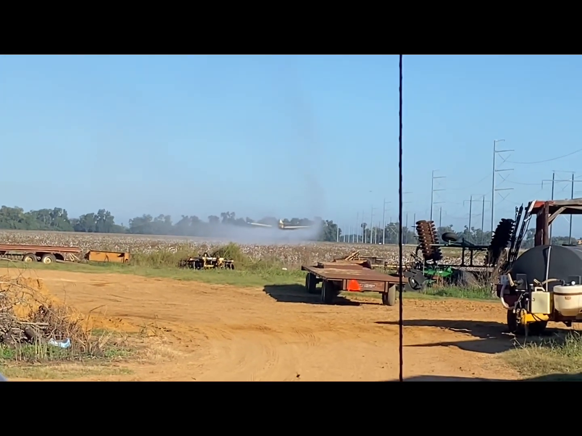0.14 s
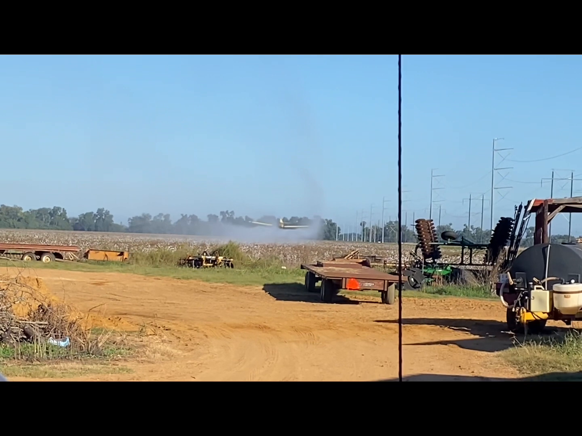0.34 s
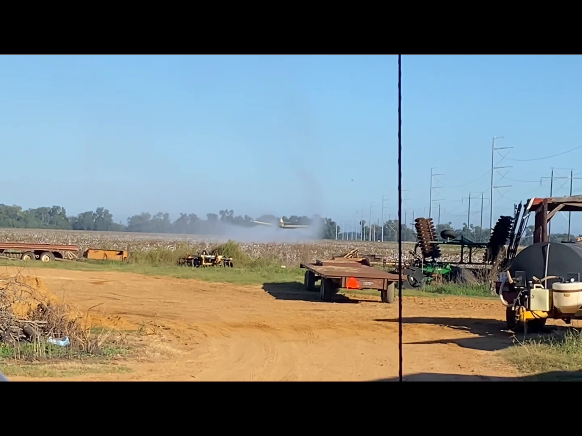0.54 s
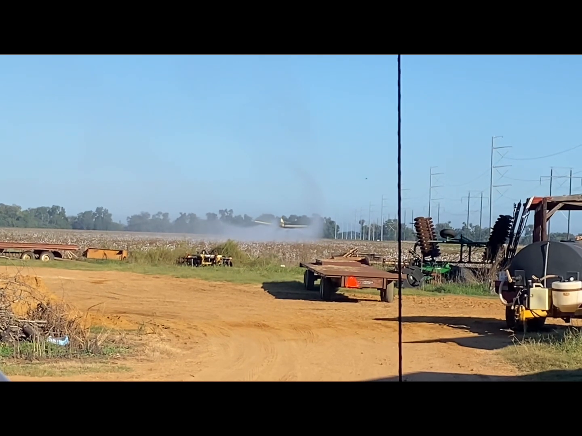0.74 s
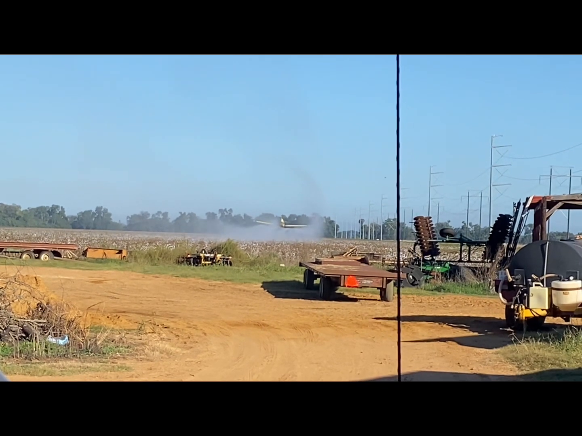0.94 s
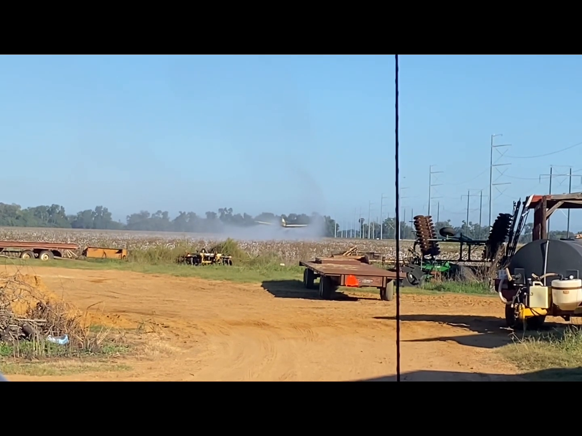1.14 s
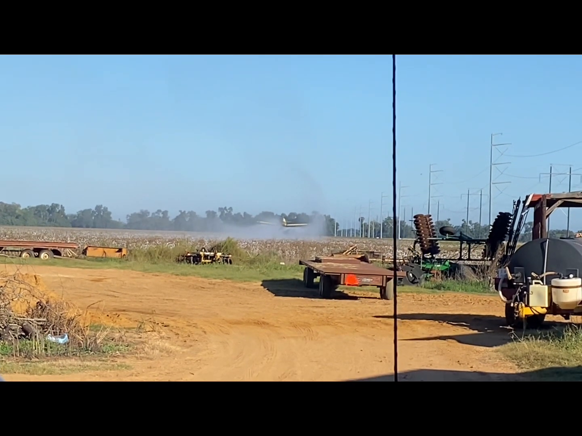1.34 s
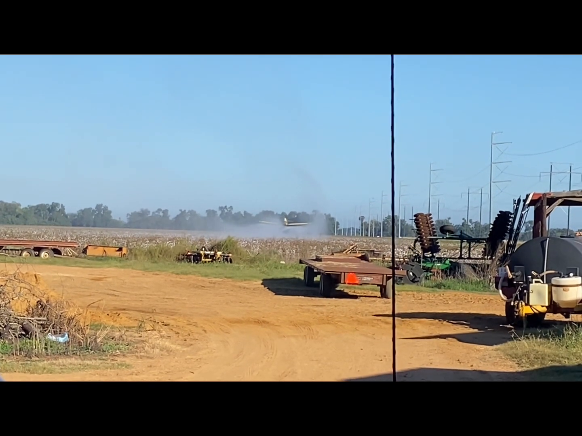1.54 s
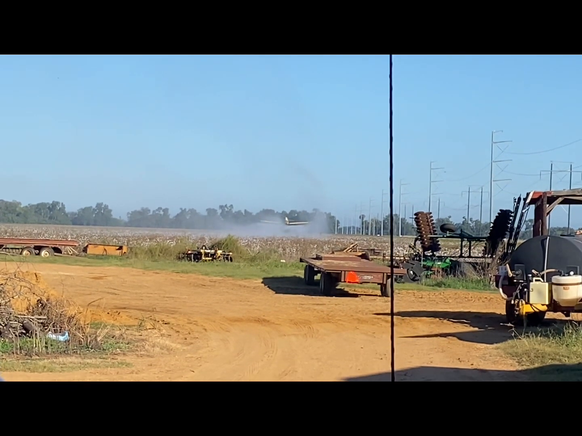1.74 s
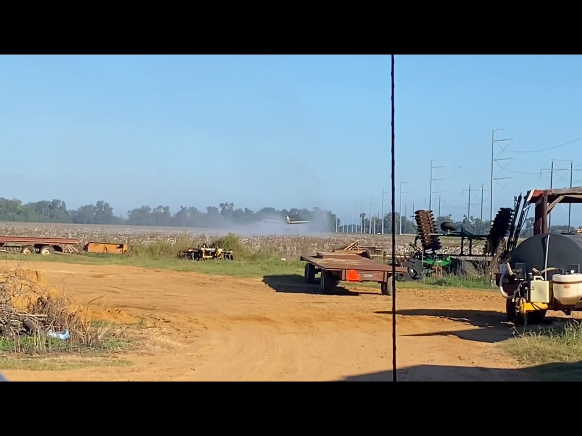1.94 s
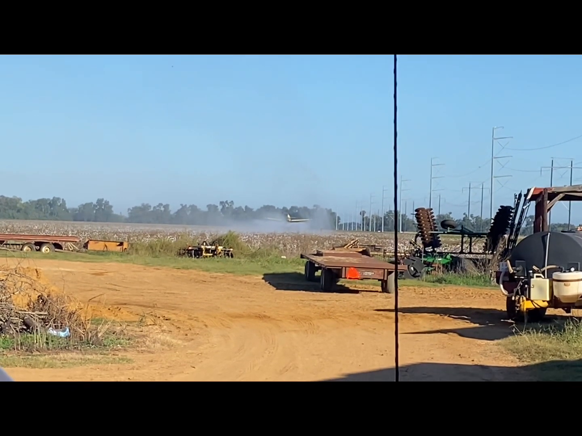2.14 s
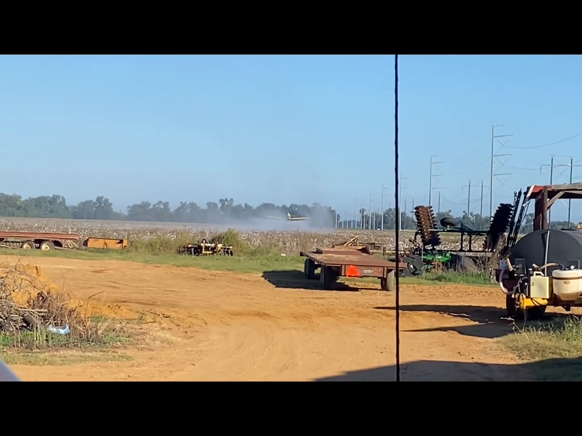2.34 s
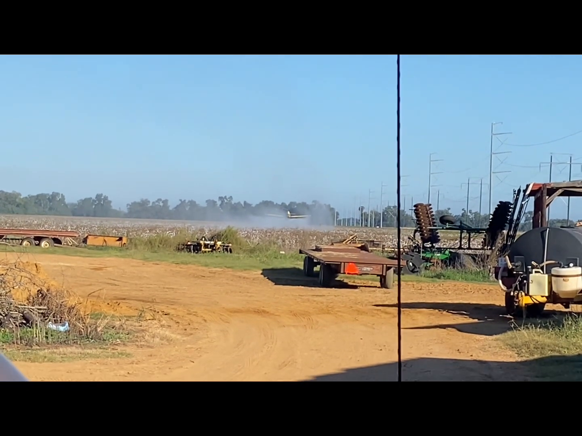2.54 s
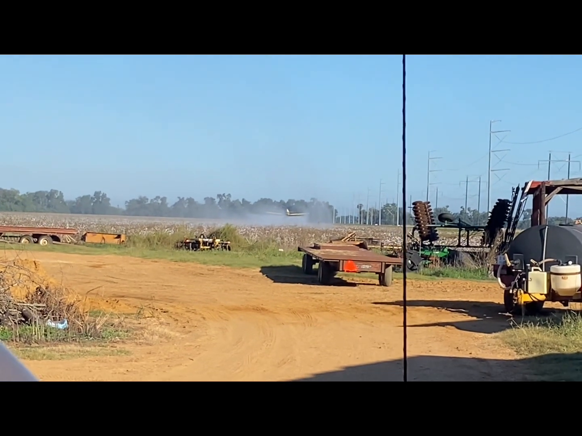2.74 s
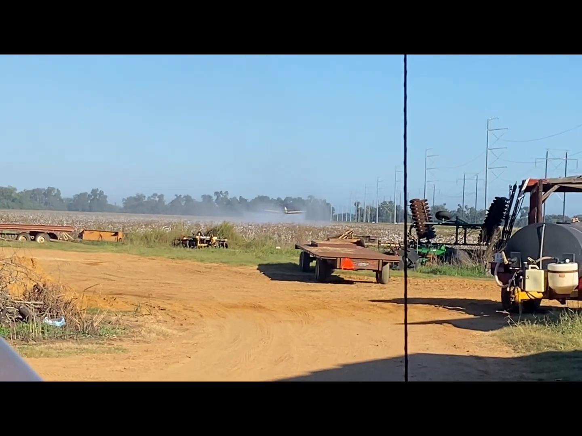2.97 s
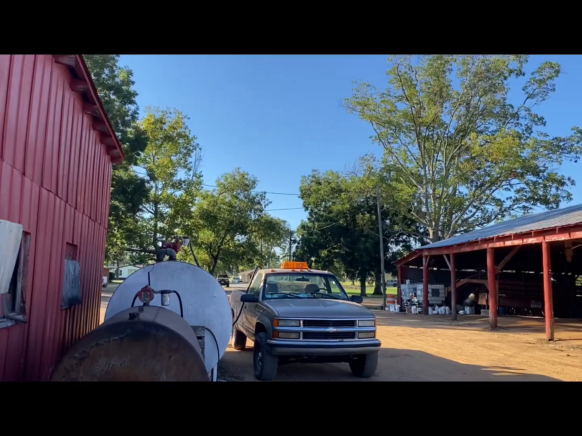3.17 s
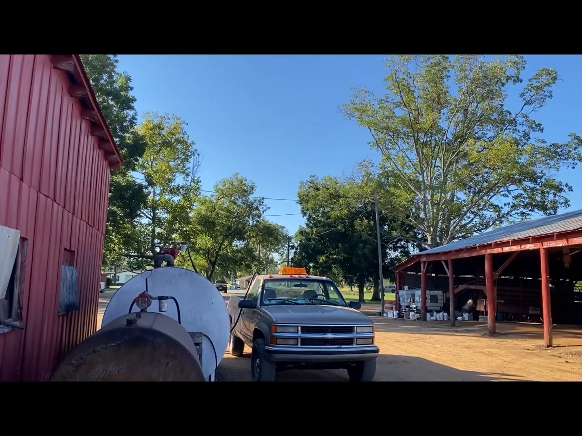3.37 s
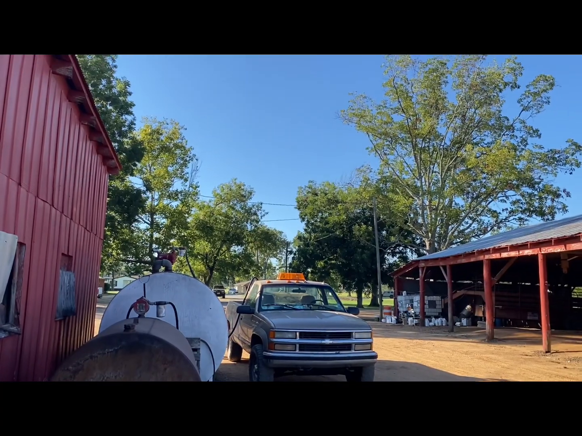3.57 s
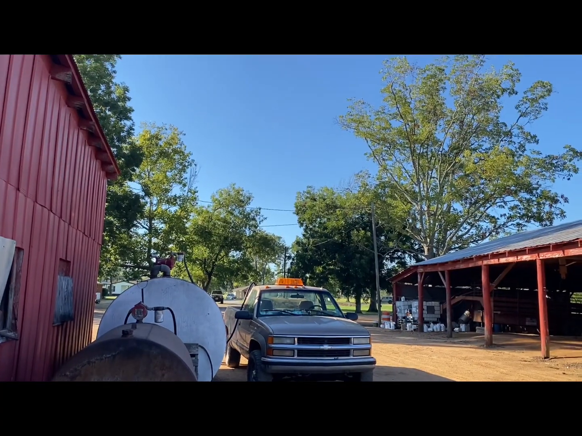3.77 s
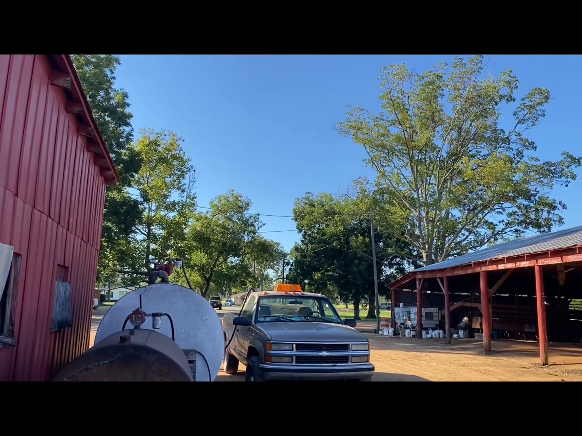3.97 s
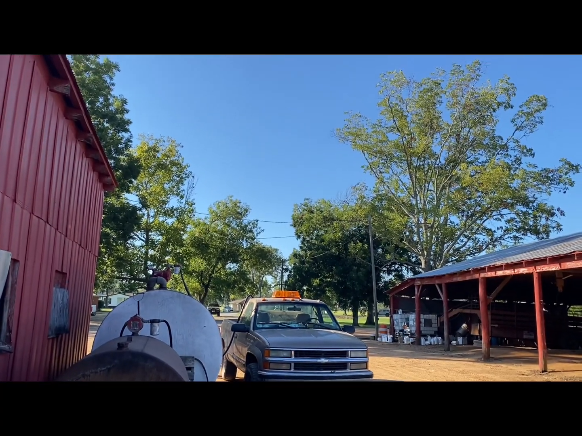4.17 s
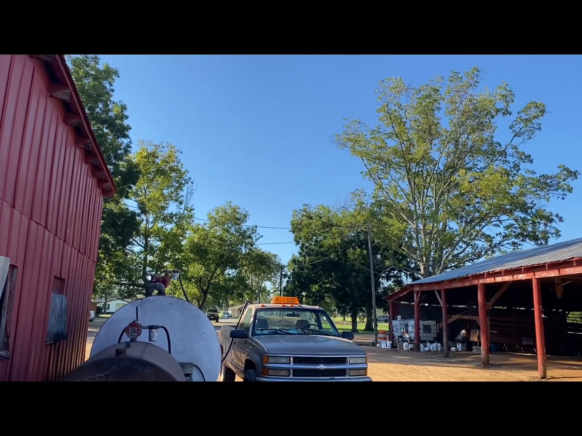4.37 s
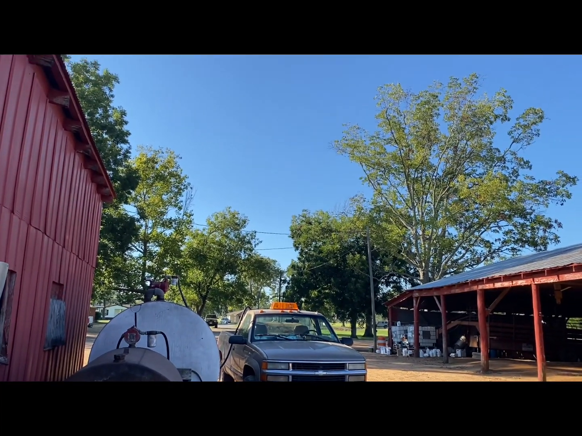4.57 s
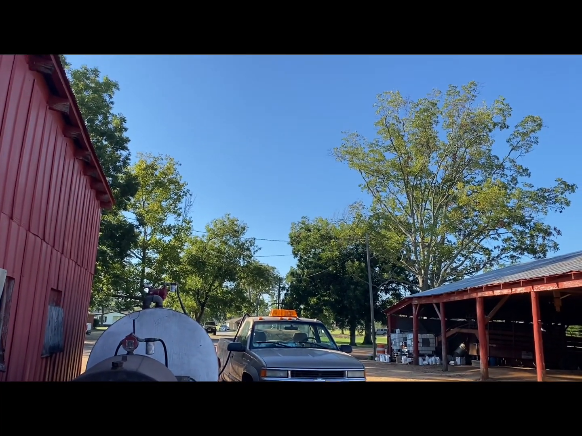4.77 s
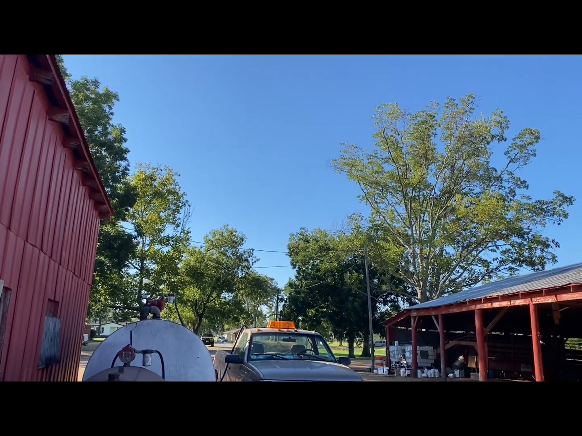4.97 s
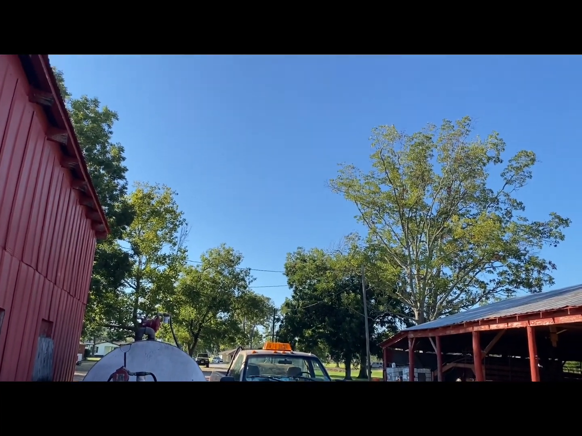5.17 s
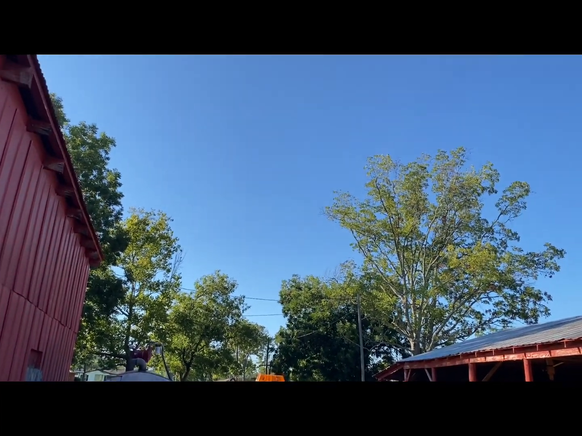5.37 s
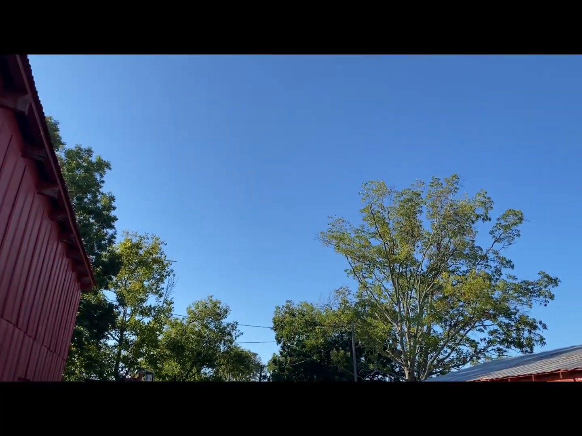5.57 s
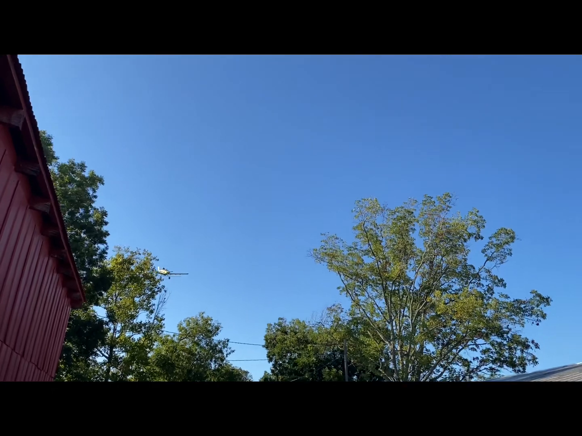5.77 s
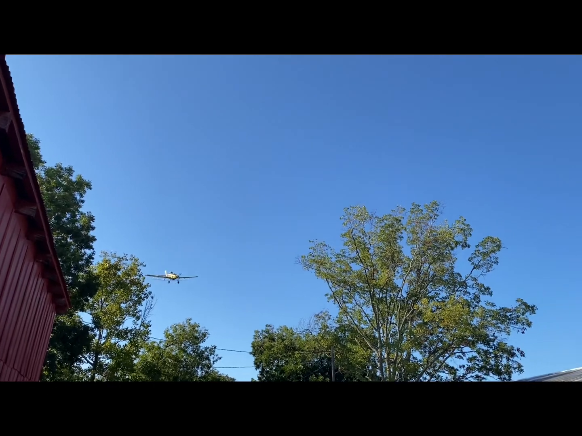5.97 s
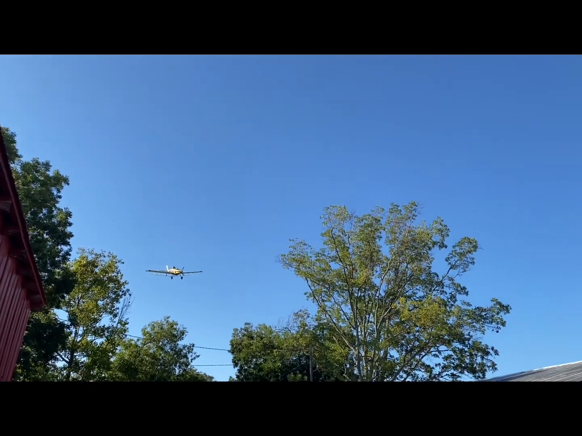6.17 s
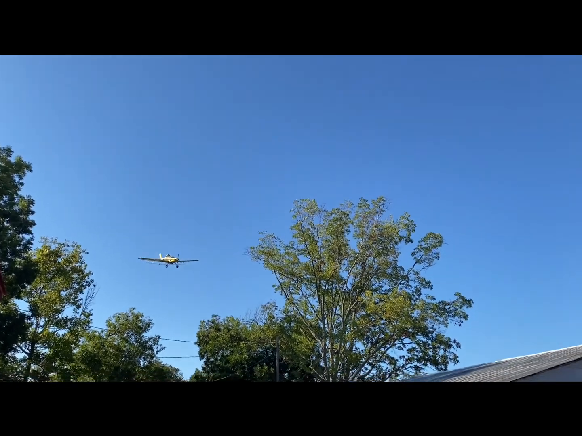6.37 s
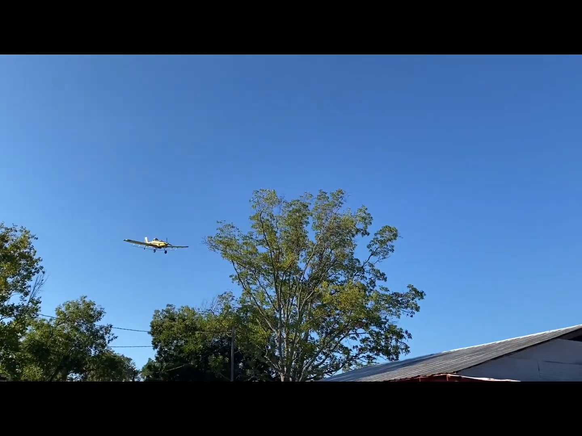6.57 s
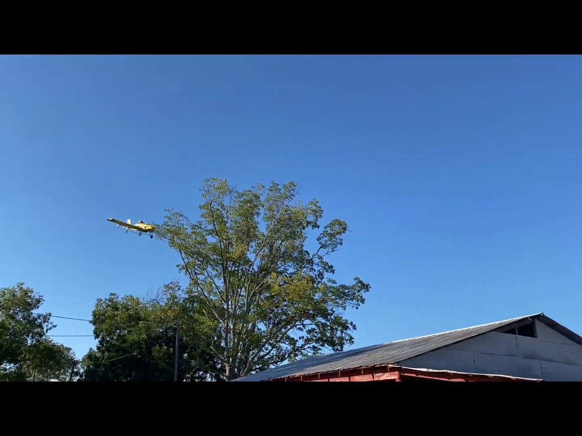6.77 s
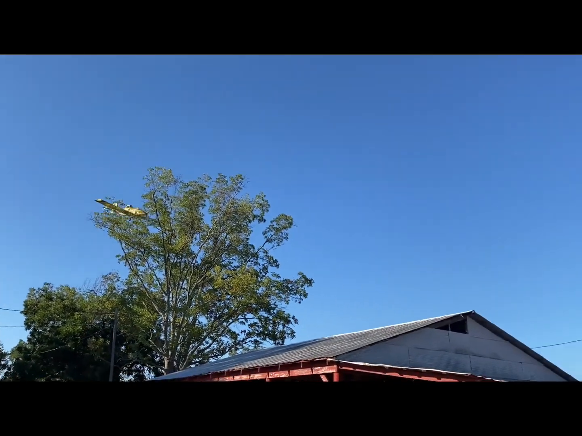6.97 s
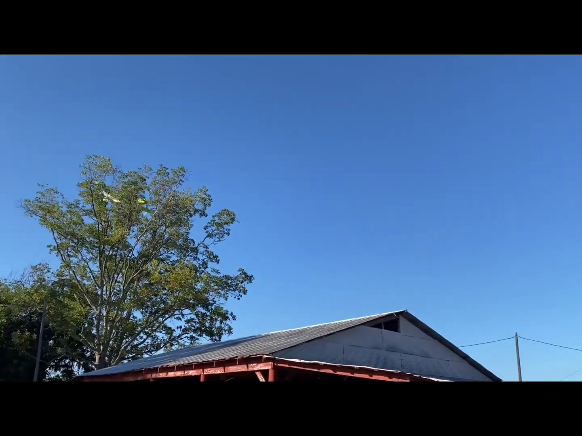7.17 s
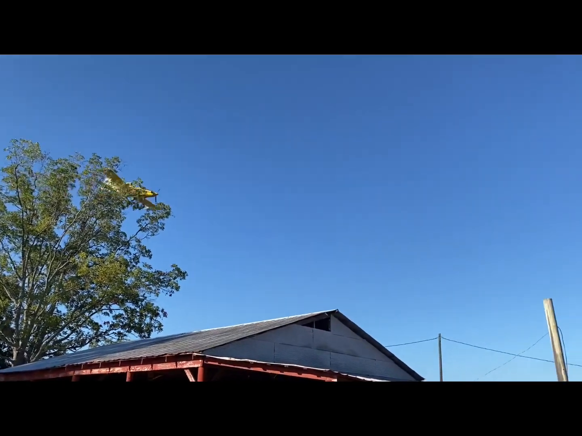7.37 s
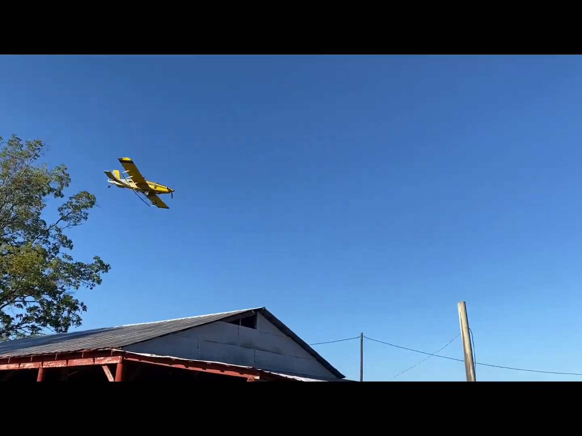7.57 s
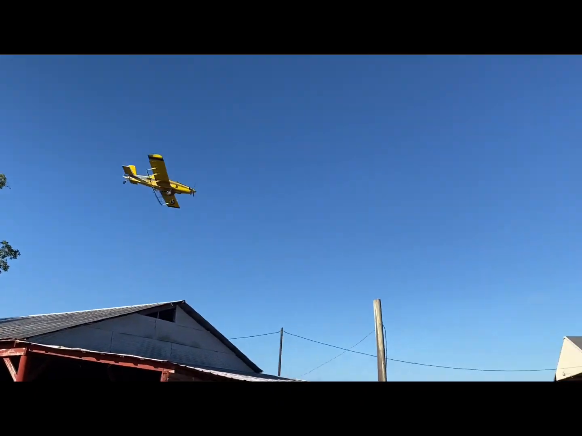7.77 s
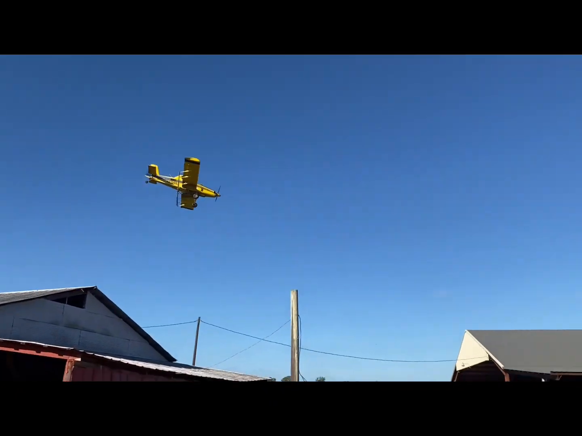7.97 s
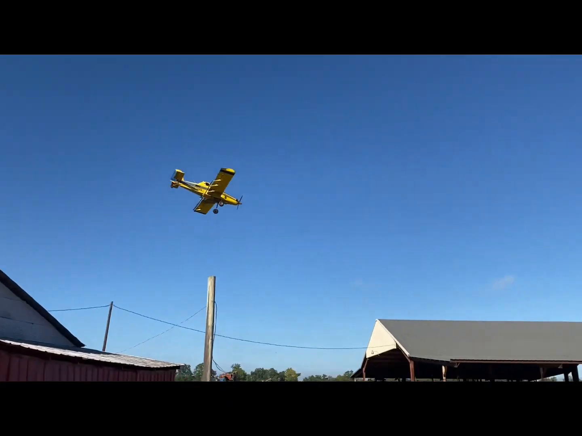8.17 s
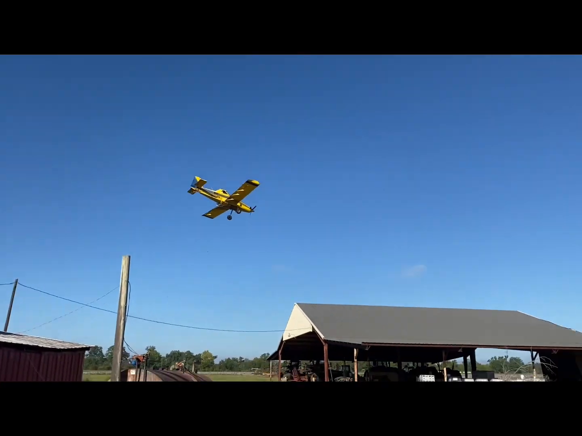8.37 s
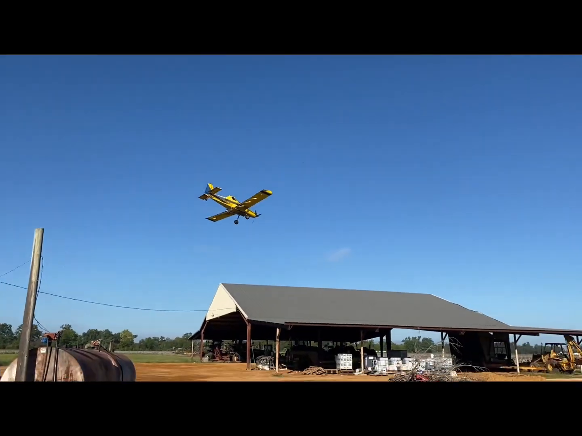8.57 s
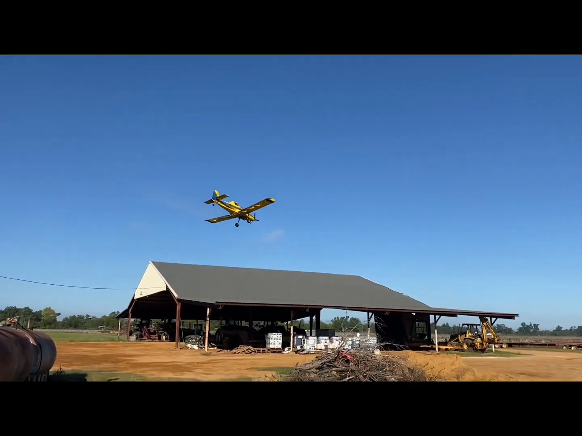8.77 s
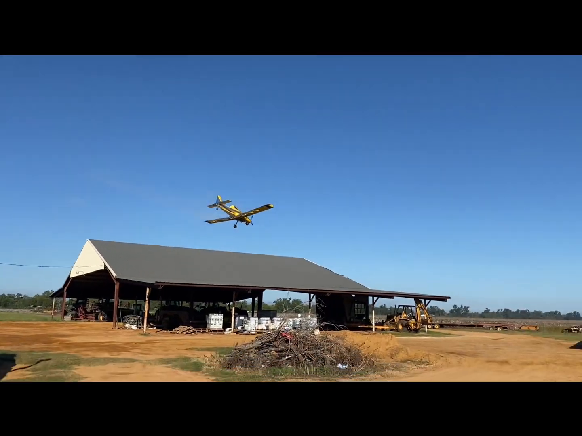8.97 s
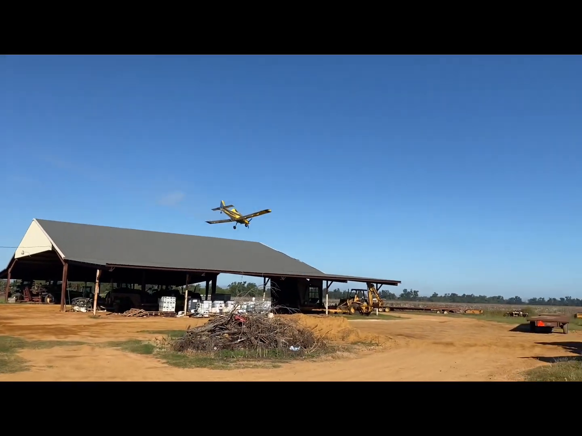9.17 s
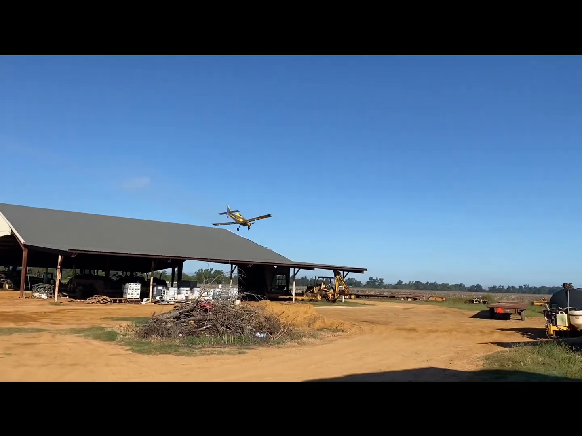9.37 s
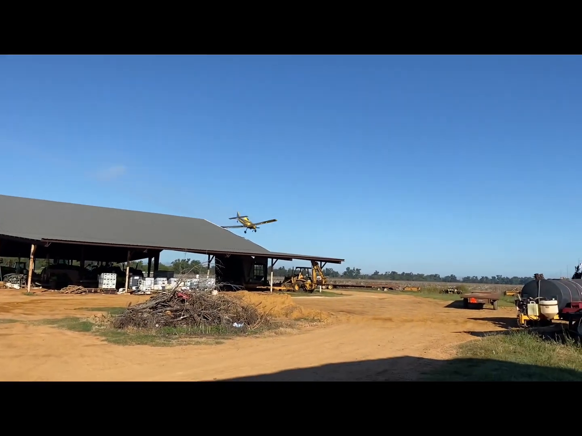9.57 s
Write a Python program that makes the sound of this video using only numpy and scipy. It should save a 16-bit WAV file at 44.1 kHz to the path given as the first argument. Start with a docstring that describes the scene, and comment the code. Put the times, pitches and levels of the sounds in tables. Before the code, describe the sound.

Outdoors on a farm, a nearby compressor and fan give a steady hum and airy hiss. The sound suddenly shifts across the yard, leaving the machine faint, and a single propeller plane builds from afar. Its rushing air, turbine whine and blade buzz become much louder than the machine, gliding down in pitch as it flies low over the microphone and leaves with a deep drone.

```python
"""A farmyard, heard from two spots. Close to a cooling unit, its compressor and fan hum and air hisses
through the cabinet; after a cut the microphone is across the yard and the unit is faint and far.
A turboprop crop duster comes in low from behind trees and a barn, banks overhead and leaves. Its blade
tone glides down (Doppler) over the rush of the propeller wash and a thin turbine whine, and the echo
off the ground combs the wash and the buzz of the blades."""
import sys
import numpy as np
from scipy.fft import rfft, irfft, next_fast_len
from scipy.io import wavfile
from scipy.ndimage import uniform_filter1d, minimum_filter1d, map_coordinates

SR = 44100
rng = np.random.default_rng(int(sys.argv[2]) if len(sys.argv) > 2 else 0)


def unload_wav(signal):
    """Save mono or channel-first audio to the path in sys.argv[1] as 16-bit WAV at rate SR, clipped to [-1, 1]."""
    wavfile.write(
        sys.argv[1],
        SR,
        np.round(np.clip(np.atleast_2d(signal).T, -1, 1) * 32767).astype(np.int16),
    )


N = 423801
CUT_S = 3.095  # from beside the unit to across the yard
NEAREST_S, PASSING_S = 7.993, 1.033  # when the plane is nearest; time it takes to fly that distance

# the plane's stereo image: freq_hz, left_right_db, side_mid_db, left_lead (-1 to 1)
PLANE_IMAGE = [(60, 2, -43, .5), (128, 0.7, -9, 0.77), (251, 2, -14.5, 0.28), (515, 2, -5.5, 0.94),
               (1080, 7.5, -3, 0.95), (1590, -4, 2.5, 0.3), (1980, -0.5, -1.5, 0.39), (2700, 5, 1, 0.53),
               (3100, 7, 0, -0.54), (4260, 1, -4.5, -0.38), (6800, -1, -7.5, .8), (8900, 1, 10, -.7),
               (10900, 0, -2.5, 0)]


def amp(db):
    """Decibels to gain."""
    return 10 ** (np.asarray(db) / 20)


def unit_rms(x):
    """Scale to rms 1."""
    return x / np.sqrt(np.mean(x ** 2) + 1e-20)


def clock():
    """The time of every sample, in seconds."""
    return np.arange(N) / SR


def along(rows, hz, column=1):
    """One column of a frequency table, read on a log axis."""
    table = np.transpose(rows)
    return np.interp(np.log(hz + 1), np.log(table[0] + 1), table[column])


def curves(rows):
    """One value per sample for each column after the time."""
    times, *columns = np.transpose(rows)
    return [np.interp(clock(), times, column) for column in columns]


def wobble(rate_hz):
    """A smooth random curve with rate_hz knots a second."""
    knots = rng.standard_normal(int(N * rate_hz / SR) + 4)
    coarse = np.arange(0, N, 32)
    return np.interp(np.arange(N), coarse, map_coordinates(knots, [coarse * rate_hz / SR]))


def swell(peak_s, length_s):
    """A smooth bump of height 1."""
    return np.exp(-(2 * (clock() - peak_s) / length_s) ** 2)


def filtered(x, response):
    """x through a complex frequency response."""
    size = next_fast_len(N + 8192, real=True)
    return irfft(rfft(x, size) * response(np.fft.rfftfreq(size, 1 / SR)), size)[..., :N]


def noise(response):
    """Two unrelated noises of rms 1 with one colour."""
    return unit_rms(filtered(rng.standard_normal((2, N)), response))


def noise_peak(centre_hz, half_width_hz):
    """Two noises gathered around one frequency."""
    return noise(lambda hz: 1 / (1 + ((hz - centre_hz) / half_width_hz) ** 2))


def swoosh(rows, width_hz):
    """A flat-topped band of noise whose centre and level follow a curve."""
    centre_hz, db = curves(rows)
    band = noise(lambda hz: 1 / (1 + (2 * hz / width_hz) ** 4))
    return amp(db) * band * np.sqrt(2) * np.sin(2 * np.pi * np.cumsum(centre_hz) / SR)


def panning(image, hz):
    """Side-to-mid gain that gives an image's left-right level difference."""
    return np.tanh(np.log(amp(along(image, hz))) / 2)


def spread(pair, image):
    """Left and right from two noises: part level difference, part phase lead, part diffuse."""
    def side_gains(hz):
        pan = panning(image, hz)
        width = np.sqrt(np.maximum(amp(along(image, hz, column=2)) ** 2 - pan ** 2, 0))
        lead = np.clip(along(image, hz, column=3), -1, 1)
        return np.array([pan + 1j * lead * width, np.sqrt(1 - lead ** 2) * width])
    side = filtered(pair, side_gains).sum(axis=0)
    return np.array([pair[0] + side, pair[0] - side])


def cooling_unit(shaft_hz=58.21, air_db=-30.5, rattle_db=0.5, rise_db=2.0):
    """Close up: compressor and fan tones beat over air hissing through ringing sheet metal."""
    # compressor hum: shaft_multiple, level_db
    compressor = [(1, -44), (2, -54), (3, -34), (4, -33), (5, -47), (6, -46), (7, -50), (8, -43), (9, -47),
                  (10, -46), (12, -43), (13, -49), (16, -53), (17, -51), (18, -48.5), (21, -59), (37, -60),
                  (39, -60), (40, -54), (44, -56), (46, -51.5), (48, -52.5), (52, -55), (53, -57),
                  (54, -58), (57, -58), (60, -59)]
    # fan and mains tones: pitch_hz, level_db
    fan = [(84, -45.5), (119.9, -46), (178.2, -37), (235.3, -48), (267, -56), (356.4, -66), (557, -50),
           (570.7, -46), (903.5, -48)]
    # air rushing through the cabinet: freq_hz, level_db
    cabinet = [(25, -23), (55, 4), (170, -0.5), (260, -2.5), (400, -5.5), (620, -1.5), (830, -7.5),
               (1080, -6), (1400, -17), (2050, -15), (2500, -11), (2800, -7.2), (3400, -10.5),
               (4150, -18.5), (5100, -15.5), (7300, -23), (8600, -33), (11000, -33), (13000, -43),
               (15000, -41)]
    # the unit's stereo image: freq_hz, left_right_db, side_mid_db, left_lead
    image = [(60, 1, -25, 0), (110, 2, -26, -.3), (200, -17, 4.5, -0.63), (380, -9, -1.5, -0.34),
             (700, -5, 1, -0.84), (1330, -7, 0.5, -0.48), (2630, -0.5, -8, 0.048), (4850, 0, -55, 0),
             (8500, -2, 4, -.3), (11900, 0, -2, 1)]
    t = clock()
    shaft_time = t + 0.00054 * np.cumsum(wobble(3.04)) / SR  # each motor drifts in speed
    fan_time = t + 0.00203 * np.cumsum(wobble(1.5)) / SR
    tones = [(multiple * shaft_hz * shaft_time, db) for multiple, db in compressor]
    tones += [(hz * fan_time, db) for hz, db in fan]
    hum = np.zeros(N)
    for turns, db in tones:
        size = amp(db + 0.52 * wobble(4.14)) * np.sqrt(2)
        hum += size * np.sin(2 * np.pi * (turns + rng.random()))
    air = noise(lambda hz: amp(along(cabinet, hz)) * sheet_metal(hz))
    air *= amp(air_db + rattle_db * wobble(90) + rise_db * (np.minimum(t / CUT_S, 1) - 1))
    return spread(air, image) + np.outer(amp([-3, 2.3]), hum)


def sheet_metal(hz, weak_db=1.9):
    """Gain of the unit's panel resonances, with many narrow weak ones scattered between them."""
    # ringing panels and pipes: centre_hz, width_hz, boost_db
    panels = [(2325, 20, 5), (2680, 18, 7), (2716, 20, 8), (2797, 16, 6), (2847, 14, 7), (2882, 18, 9),
              (2940, 14, 7), (3027, 18, 5), (3176, 16, 7), (3352, 22, 9), (3505, 35, 4.5), (3590, 40, 6),
              (4680, 60, 6), (4870, 110, 4), (5720, 110, 1), (6400, 100, 4), (7020, 300, 3)]
    strong = sum(db / (1 + (2 * (hz - centre) / width) ** 2) for centre, width, db in panels)
    weak = np.interp(hz / 11, np.arange(2100), rng.standard_normal(2100))
    return amp(strong + weak_db * weak * np.clip(hz / 2000, 0, 1))


def far_machinery(air_db=-34.0, throb_db=-40, ring_db=-47, mains_db=-47):
    """From across the yard the unit is dull and diffuse among the sheds: throb, hollow ring, whines."""
    # rush of air at a distance: freq_hz, level_db
    air_colour = [(25, -8.5), (115, -4.5), (146, -2.5), (237, -3), (330, 3), (420, 1), (510, -11),
                  (720, -4.5), (850, -13.5), (1020, -8.5), (1150, -11), (1350, -23.5), (2000, -24.5),
                  (2750, -25.5), (3280, -22), (3900, -34.5), (4750, -31), (5300, -36), (6400, -39.5),
                  (7100, -34.5), (10500, -67), (15000, -49)]
    # thin, steady whines: pitch_hz, level_db
    whine_tones = [(2326, -66), (2632, -68), (3252, -66), (3381, -66), (3720, -68), (4883, -70.5)]
    # the yard's stereo image: freq_hz, left_right_db, side_mid_db, left_lead
    image = [(60, -3, -18, 0), (110, -0.5, -22, 0), (200, 5, -5.5, 0), (380, 1.5, -17.5, 0),
             (700, 1, -7, 0.1), (1290, 6.5, -3, 0.2), (2380, 5.5, -2, 0.1), (4400, 5, -4, 0),
             (8120, -1, -2, 0)]
    t = clock()
    air = amp(air_db) * noise(lambda hz: amp(along(air_colour, hz)) * sheet_metal(hz))
    throb = amp(throb_db) * unit_rms(noise_peak(366, 22) * amp(3.5 * np.tanh(wobble(14))))
    ring = amp(ring_db) * unit_rms(noise_peak(1025, 25) + noise_peak(1110, 30))
    hum = amp(mains_db) * np.sin(2 * np.pi * 120 * t)
    whines = sum(amp(db) * noise_peak(0, 9) * np.sqrt(2) * np.sin(2 * np.pi * hz * t)
                 for hz, db in whine_tones)
    return spread(air + throb + ring + whines, image) + hum


def track():
    """How far the plane is past its nearest point, in units of the nearest distance."""
    return (clock() - NEAREST_S) / PASSING_S


def distance():
    """Distance from microphone to plane; 1 at its nearest."""
    return np.hypot(1, track())


def astern():
    """Rises from 0 to 1 as the plane turns its tail to the microphone."""
    return np.clip(track() - 0.41, 0, 1)


def hidden(clear_s, taking_s):
    """1 while an obstacle screens the plane, 0 once it is clear."""
    return np.clip((clear_s - clock()) / taking_s, 0, 1)


def beam(db, aim_deg, width_deg, depth_db, trees_db, barn_db=0):
    """Level in dB of a beam sweeping over the microphone, weakened by distance, trees and barn."""
    angle_deg = np.degrees(np.pi / 2 + np.arctan(track()))
    off_aim = 1 - np.exp(-((angle_deg - aim_deg) / width_deg) ** 2)
    screened_db = trees_db * hidden(clear_s=5.41, taking_s=1.6)
    screened_db += barn_db * hidden(clear_s=6.34, taking_s=0.34)
    return db - depth_db * off_aim - 20 * np.log10(distance()) - screened_db


def blade_rate(centre_hz=104.02, swing_hz=20.45):
    """Doppler: the pitch follows the share of the plane's speed that points at the microphone."""
    return centre_hz - swing_hz * track() / distance()


def propeller(blade_phase, harmonics=15, fall_db=1.9, flutter_db=1.5, rough_db=1.55, lead_s=0.00019):
    """Harmonics of the blade rate; turbulent air shakes their level and phase, most from afar."""
    # the deep blade tone: time_s, level_db
    tone_levels = [(3.15, -50), (3.29, -45), (3.99, -39), (4.03, -60), (6.62, -40), (6.96, -21.5),
                   (7.16, -32), (7.23, -19.5), (7.61, -21), (7.7, -16), (7.86, -34), (7.95, -20.5),
                   (8.01, -31.5), (8.24, -15), (9.03, -12.5), (9.43, -19), (9.5, -36), (9.61, -16.5)]
    # the drone an octave above it: time_s, level_db
    drone_levels = [(3.15, -45), (3.35, -50.5), (4.68, -41), (4.73, -60), (4.8, -32), (6.37, -31.5),
                    (6.44, -25), (7.25, -28.5), (7.38, -15.5), (8.04, -11.5), (8.89, -26.5), (9.14, -39),
                    (9.39, -24), (9.61, -34)]
    # buzz beamed sideways from the blade tips, harmonics 3 and 4 also forward:
    # harmonic, level_db, aim_deg, width_deg, depth_db
    buzz_beams = [(3, -14.5, 98.3, 32, 18.5), (3, -19, 54.1, 7.8, 36), (4, -18, 90, 33, 24.5),
                  (4, -23, 63.2, 5.6, 27), (5, -20.5, 102, 15, 17), (6, -21, 83.3, 22, 23),
                  (7, -25.5, 86, 31, 20), (8, -31, 95, 29, 21), (9, -31, 86, 23, 23)]
    # one beam for all higher harmonics: level_db, aim_deg, width_deg, depth_db
    top_beam = (-30, 85, 32, 13.5)
    lobe = lambda shape: amp(beam(*shape, trees_db=11) - 8 * astern())
    sizes = [amp(curves(levels)[0] - 0.5) for levels in (tone_levels, drone_levels)]
    for harmonic in sorted({row[0] for row in buzz_beams}):
        sizes.append(sum(lobe(row[1:]) for row in buzz_beams if row[0] == harmonic))
    slope = amp(-fall_db * np.arange(harmonics - len(sizes)))
    sizes += list(np.outer(slope / np.linalg.norm(slope), lobe(top_beam)))
    turbulence = 1.27 * distance() ** 0.35
    shake = 0.036 * turbulence * wobble(16)
    mean_hz = blade_rate().mean()
    partials = []
    for k, size in enumerate(sizes, 1):
        flutter = amp(flutter_db * turbulence * np.sqrt(k) / 2 * wobble(18))
        roughness = amp(rough_db * min(k - 1, 4) / 4 * wobble(70))
        size = size * np.sqrt(2) * flutter * roughness
        smear = 0.035 * wobble(45)  # echoes off the sheds smear each blade's pulse
        angle = k * (blade_phase + shake + smear) + 2 * np.pi * rng.random()
        hz = k * mean_hz
        mid = size * np.sin(angle)
        left_lead = np.pi * hz * lead_s * size * np.cos(angle)  # the left capsule hears it first
        side = panning(PLANE_IMAGE, hz) * mid + left_lead
        partials.append(np.array([mid + side, mid - side]))
    tone, drone, *buzz = partials
    return tone + shed_echoes(drone + ground_echo(sum(buzz), strength=0.33, dull_hz=800))


def ground_echo(x, strength=0.48, dull_hz=1700, abeam_lag_s=0.00418, sink=0.17):
    """Add a duller bounce off rough dirt; its lag follows the plane's elevation, so the comb sweeps."""
    t = clock()
    height = 1 - sink * track()
    lag_s = abeam_lag_s * height / distance()
    dull = filtered(x, lambda hz: 1 / np.sqrt(1 + (hz / dull_hz) ** 4))
    return x + strength * np.array([np.interp(t - lag_s, t, channel) for channel in dull])


def shed_echoes(x, near_db=-16, far_boost_db=9, spacing_s=0.055, count=3):
    """Late copies off sheds and treetops keep the earlier, higher pitch and blur each harmonic."""
    t = clock()
    mid = (x[0] + x[1]) / 2
    copies = [[wobble(55) * np.interp(t - spacing_s * k, t, mid) for _ in x]
              for k in range(1, count + 1)]
    share = amp(near_db + far_boost_db * np.log2(np.minimum(distance(), 2)))
    return (x + share * np.sum(copies, axis=0) / np.sqrt(count)) / np.sqrt(1 + share ** 2)


def wash(blade_phase, trim_db=-2, chop=0.1, flicker_db=1.03):
    """Turbulent air from propeller and exhaust, chopped once a blade; hiss opens up past the barn."""
    # colour of the wash: freq_hz, level_db
    colour = [(25, -42), (60, -5.5), (140, -2.5), (190, 6.5), (250, 5), (420, 0.5), (600, -4), (800, -8),
              (1350, -12), (1620, -17.5), (2000, -17.5), (2400, -18.5), (4200, -23), (6500, -29),
              (8800, -41.5), (10200, -27.5), (12000, -27), (14000, -42)]
    # borders of its bands (rumble, roar, rush, rasp, sizzle, hiss, fizz): edge_hz
    edges = [20, 135, 550, 1700, 3200, 5000, 8000, 16000]
    # one beam a band: level_db, aim_deg, width_deg, depth_db, trees_loss_db, barn_loss_db
    beams = [(-22.5, 49, 42, 8.5, 7, 4.5), (-19.5, 42, 73, 7.5, 12, 0.9), (-23, 54, 89, 7, 16, 2.5),
             (-28, 61.6, 15, 7.5, 12, 1.5), (-30.5, 60, 43.4, 13.5, 8, 6.5), (-33.5, 23, 34, 3.5, -1, 15),
             (-47, 92, 35, 5, -6.5, 5)]
    # the treble comes in waves: time_s, level_db
    treble_waves = [(6.7, -1), (7.2, 3), (7.4, 1), (7.56, -3.5), (7.8, 3.3), (7.98, -1.5), (8.17, 2.2),
                    (8.58, -5), (8.95, 4), (9.5, -5.5)]
    gust_db = wobble(9) + 1.7 * swell(peak_s=5.73, length_s=0.35)  # a surge as the plane tops the trees
    treble_db, = curves(treble_waves)
    rush = np.zeros((2, N))
    for low, high, shape in zip(edges, edges[1:], beams):
        skirts = lambda hz: np.sqrt((1 + (low / (hz + 1)) ** 12) * (1 + (hz / high) ** 12))
        band = noise(lambda hz: amp(along(colour, hz)) / skirts(hz))
        dulling_db = 2 * astern() * min(low / 4700, 1)  # the treble fades behind the tail
        waves_db = treble_db * min(low / 3200, 3200 / low)
        rush += band * amp(beam(*shape) - dulling_db + waves_db + trim_db + gust_db
                           + flicker_db * wobble(25))
    chopped = rush * (1 + chop * np.cos(blade_phase)) / np.sqrt(1 + chop ** 2 / 2)
    return spread(ground_echo(chopped), PLANE_IMAGE)


def rumble_puffs(centre_hz=80):
    """Brief swells of low rumble, alike in both channels."""
    # the swells: peak_s, length_s, level_db
    puffs = [(3.452, 0.075, -34), (4.7, 0.7, -45), (6.355, 0.15, -33), (7.227, 0.25, -28)]
    rumble = noise(lambda hz: (hz / centre_hz) ** 3 / (1 + (hz / centre_hz) ** 7))[0]
    return rumble * sum(amp(db) * swell(peak_s, length_s) for peak_s, length_s, db in puffs)


def turbine(blade_phase, whine_ratio=96.4, gear_ratio=28.4, steady=0.75):
    """Fuzzy whines geared to the propeller glide down with it, over a broad howl and a brief slide."""
    # compressor whine, gone once the plane is past: time_s, level_db
    whine_levels = [(5.9, -95), (6.35, -66), (7.0, -56), (7.3, -59), (7.75, -49.5), (8.15, -54), (8.4, -70),
                    (8.7, -95)]
    # gearbox whine, coming and going as the plane banks: time_s, level_db
    gear_levels = [(3.1, -90), (6.0, -62), (6.2, -49), (6.55, -48), (6.8, -55), (7.17, -43.5), (7.4, -48),
                   (7.68, -37), (8.02, -42), (8.22, -58), (8.5, -57), (8.65, -47), (9.55, -46)]
    # broad howl that sinks slowly: time_s, pitch_hz, level_db
    howl_curve = [(4.6, 2150, -80), (5.15, 2130, -57), (5.7, 2060, -46), (6.2, 2020, -46),
                  (6.65, 1990, -40.5), (7.35, 1980, -36), (8.0, 1900, -38.5), (8.5, 1780, -43.5),
                  (9.1, 1700, -62)]
    # a whine that slides down as the plane clears the barn: time_s, pitch_hz, level_db
    slide_curve = [(5.2, 2880, -85), (6.1, 2860, -56), (6.38, 2820, -45), (6.55, 2700, -45),
                   (6.8, 2590, -43), (7.1, 2530, -52), (7.5, 2480, -85)]
    whine_gain = amp(curves(whine_levels)[0] + 1.5 * wobble(14))
    whine = whine_gain * noise_peak(0, 220) * np.sin(whine_ratio * blade_phase)
    grind = steady + np.sqrt(1 - steady ** 2) * noise_peak(0, 70)
    stray = 0.38 * wobble(35)  # the path through turbulent air smears the gear tone
    gears = amp(curves(gear_levels)[0]) * grind * np.sin(gear_ratio * blade_phase + stray)
    howl = swoosh(howl_curve, width_hz=240)
    slide = swoosh(slide_curve, width_hz=130)
    return spread(np.sqrt(2) * (whine + gears) + howl + slide, PLANE_IMAGE)


def moans():
    """Hollow bands in the roar that sweep down as the plane closes in."""
    # one curve a moan: time_s, pitch_hz, level_db
    sweeps = [
        [(4.8, 660, -70), (5.3, 625, -40), (5.75, 570, -36.5), (6.4, 530, -41), (6.9, 510, -70)],
        [(6.1, 1000, -70), (6.4, 850, -41), (6.6, 700, -40), (6.8, 600, -35), (7.2, 560, -60)],
    ]
    return spread(sum(swoosh(rows, width_hz=95) for rows in sweeps), PLANE_IMAGE)


def scene():
    """Beside the cooling unit up to the cut, then across the yard under the passing plane."""
    blade_phase = 2 * np.pi * np.cumsum(blade_rate()) / SR
    after_cut = np.clip((clock() - CUT_S) / 0.006 + 0.5, 0, 1)
    plane = propeller(blade_phase) + wash(blade_phase) + moans() + turbine(blade_phase)
    return (1 - after_cut) * cooling_unit() + after_cut * (far_machinery() + rumble_puffs() + plane)


def record(dry, ceiling=0.93, low_cut_hz=20, top_hz=15800):
    """The microphone chain holds the loudest peaks down and cuts the deepest bass and highest treble."""
    needed = ceiling / np.maximum(np.abs(dry).max(axis=0), ceiling)
    gain = uniform_filter1d(minimum_filter1d(needed, size=1201), size=1201)
    return filtered(dry * gain, lambda hz: (hz < top_hz) * hz ** 2 / (hz ** 2 + low_cut_hz ** 2))


dry = scene()
out = record(dry)
unload_wav(out)
```